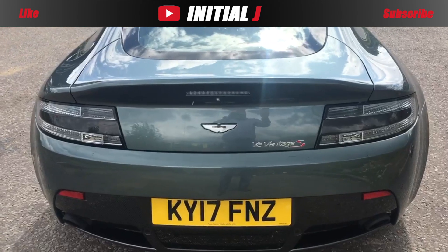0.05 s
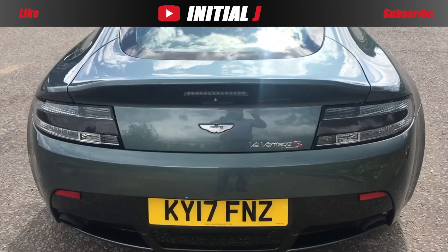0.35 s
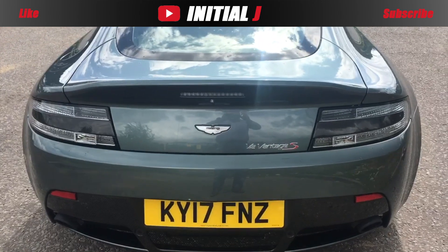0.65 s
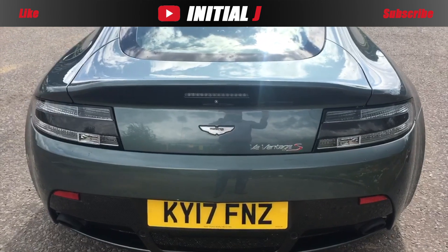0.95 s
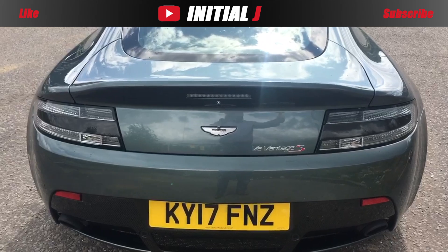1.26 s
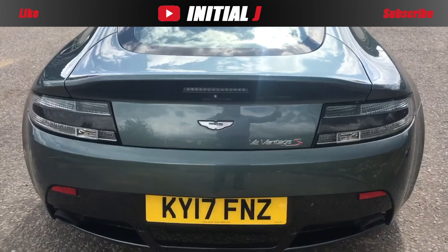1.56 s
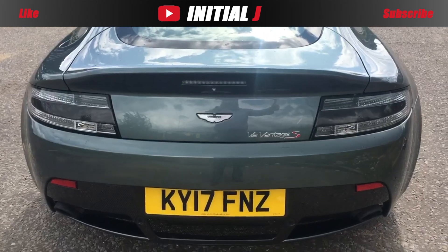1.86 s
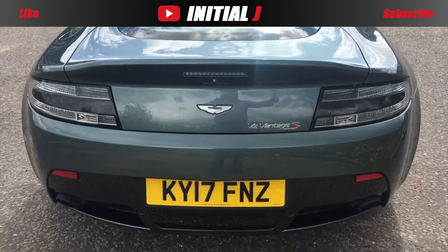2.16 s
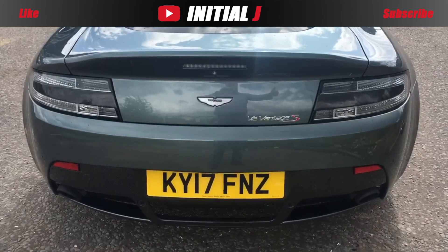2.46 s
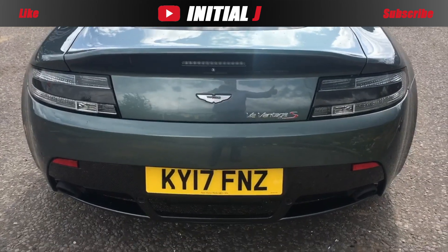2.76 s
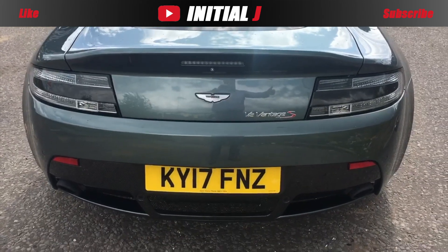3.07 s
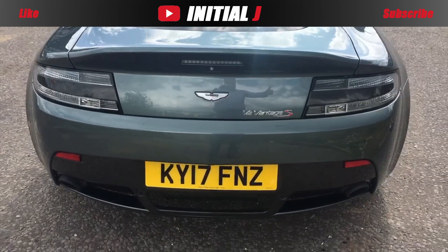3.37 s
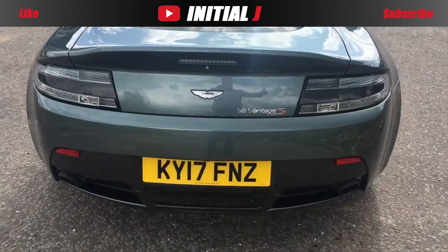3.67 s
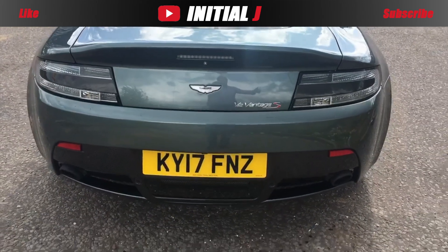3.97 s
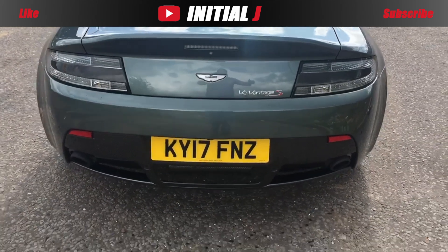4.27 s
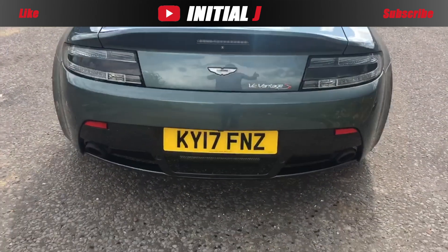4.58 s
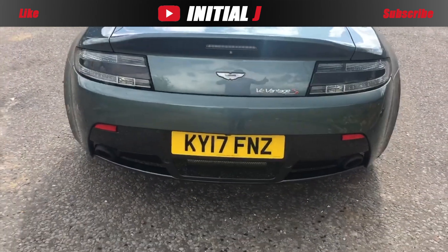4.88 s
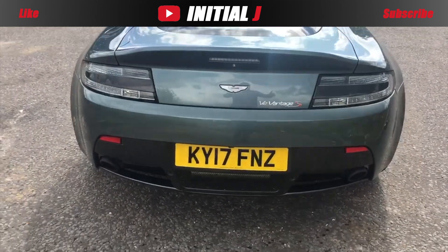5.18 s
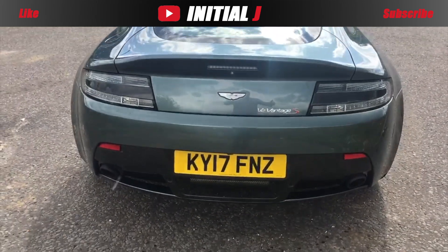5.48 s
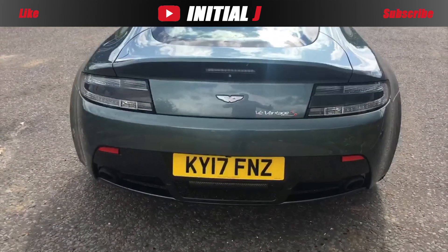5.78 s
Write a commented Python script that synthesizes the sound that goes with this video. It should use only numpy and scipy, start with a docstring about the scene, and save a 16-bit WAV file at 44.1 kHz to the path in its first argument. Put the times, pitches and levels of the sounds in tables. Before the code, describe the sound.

Two loud revs from an idling eight-cylinder car, with exhaust cracks and popping as the engine winds down between them.

```python
"""A low idling hum leaps into a hard rev, cracks and burbles back down to idle, then revs again.
It is an eight-cylinder sports car on open tarmac, heard from behind its tailpipes. Each firing pushes
out a pulse of gas: the pulses make the note, ring the silencer and pipes, and steepen into hiss under
load. Unburnt fuel pops on the overrun, when the engine coasts with the throttle shut.
The listener steps back a little; a limiter holds the loudest moments."""
import sys
import numpy as np
from scipy import signal
from scipy.io import wavfile
from scipy.ndimage import uniform_filter1d, minimum_filter1d

SR = 44100
rng = np.random.default_rng(int(sys.argv[2]) if len(sys.argv) > 2 else 0)


def store_pcm(level_fs):
    """Save levels as 16-bit WAV."""
    pcm = np.round(np.clip(level_fs, -1, 1) * 32767).astype(np.int16)
    wavfile.write(sys.argv[1], SR, np.atleast_2d(pcm).T)


N = 257103
T = np.arange(N) / SR
IDLE_HZ = 72.25  # firings per second

# how each firing of one engine cycle departs from the mean pulse: (offset [relative])
CYLINDER_OFFSETS = [0.92, 1, -0.27, 0.0057, 0.34, 0.08, -1, -0.27]
# blips of the throttle: (opens [s], is shut [s], closing takes [s])
THROTTLE_BLIPS = [(1.507, 2.015, .09), (5.362, 5.805, 0.033)]


def amp(db):
    """Decibels to gain."""
    return 10 ** (np.asarray(db) / 20)


def running_rms(x, seconds):
    """The smoothed level of x."""
    size = int(seconds * SR)
    return np.sqrt(abs(uniform_filter1d(uniform_filter1d(x * x, size), size)) + 1e-14)


def steady(x, seconds=0.032):
    """Scales x to a running rms of 1."""
    return x / running_rms(x, seconds)


def band(x, lo_hz, hi_hz, order=2):
    """Band-pass filter."""
    edges_hz = [max(lo_hz, 5), min(hi_hz, SR / 2 - 100)]
    return signal.sosfilt(signal.butter(order, edges_hz, "band", fs=SR, output="sos"), x)


def ring(x, hz, width):
    """One resonance with steep skirts."""
    return band(x, hz - width / 2, hz + width / 2)


def colour(x, points):
    """Minimum-phase EQ through (frequency [Hz], gain [dB]) points: it rings only after each impulse."""
    hz, db = np.transpose(points)
    bins_hz = abs(np.fft.fftfreq(2048, 1 / SR))
    log_gain = np.log(amp(np.interp(np.log(bins_hz + 1), np.log(hz + 1), db)))
    taps = np.fft.ifft(np.exp(np.conj(signal.hilbert(log_gain)))).real
    return signal.oaconvolve(x, taps[:len(taps) // 2])[:N]


def response(points, hz):
    """Reads (frequency [Hz], gain [dB]) points on a log-frequency axis."""
    points_hz, db = np.transpose(points)
    return np.interp(np.log(hz), np.log(points_hz), db)


def wander(per_s):
    """A random drift of about unit size."""
    return np.interp(T * per_s, np.arange(4000), rng.standard_normal(4000))


def gate(start, end, rise_s, fall_s):
    """Rises from start, holds at 1 until end, then falls."""
    return np.clip((T - start) / rise_s, 0, 1) * np.clip(1 - (T - end) / fall_s, 0, 1)


def add(mix, s, sound):
    """Mixes a sound in at time s."""
    part = mix[max(round(s * SR), 0):][:len(sound)]
    part += sound[:len(part)]


def bursts(events, lo_hz, hi_hz, rise_s, decay_s, gain_db):
    """A short dying burst of band noise for each event, peaking at its level plus gain_db."""
    out, t = np.zeros(N), T[:4096]
    for s, db in events:
        burst = rng.standard_normal(len(t)) * (1 - np.exp(-t / rise_s)) * np.exp(-t / decay_s)
        burst = band(band(burst, lo_hz, hi_hz, order=1), lo_hz / 2, 2 * hi_hz)
        add(out, s, amp(db + gain_db) * burst / abs(burst).max())
    return out


def stepped_back():
    """The listener's place, from 0 (close) to 1 (farther back)."""
    return np.interp(T, (3.4, 4.85), [0, 1])


def sag_db():
    """The low end dips before each rev."""
    # dips: (start [s], end [s], gain [dB])
    dips = [(1.382, 1.453, -4.5), (4.477, 5.341, -5.5)]
    return sum(db * gate(start, end, .015, 0.016) for start, end, db in dips)


def firing_rate():
    """Firings per second: a climb on the throttle, then friction slows the engine until it idles."""
    # the climb of every rev: (time since opening [s], firing rate [Hz])
    climb = [(0, 72), (.04, 80), (.08, 97), (.12, 137), (.2, 223), (.28, 337), (.36, 450), (.42, 505),
             (.475, 528)]
    # the spin-down: (time since shutting [s], speed [share of the top speed])
    spin_down = [(0, 0.98), (.16, .885), (.52, .672), (.88, .506), (1.22, .368), (1.6, .303), (1.96, .25),
                 (2.36, .183), (3.05, .132)]
    rate = IDLE_HZ - .3 * T  # the idle droops slightly
    for opens, shuts, _ in THROTTLE_BLIPS:
        revved_hz = np.interp(np.minimum(T, shuts) - opens, *np.transpose(climb), left=0)
        rate = np.maximum(rate, revved_hz * np.interp(T - shuts, *np.transpose(spin_down)))
    return rate


def blip(opens, shuts, closing_s, opening_s=0.07):
    """The throttle opens evenly, is held, eases off and then snaps shut."""
    closing = np.clip((T - shuts) / closing_s + 1, 0, 1)
    return np.clip((T - opens) / opening_s, 0, 1) * (1 - closing ** 2)


def driving(onset_s=0.034, coast_s=2.34, recover_s=0.65):
    """Throttle, overrun and raggedness of combustion, each 0-1."""
    # a little gas fed in on the way down: (start [s], end [s], throttle [0-1])
    feeds = [(1.973, 2.097, .08), (2.12, 2.289, .38), (2.688, 3.107, 0.2), (4.596, 4.946, 0.02)]
    # spells of ragged combustion: (start [s], end [s], fade [s], depth [0-1])
    spells = [(1.596, 1.619, 0.013, .55), (1.853, 1.955, 0.01, 0.93), (3.156, 3.433, 0.088, 0.81),
              (3.462, 4.047, 0.34, 0.88), (4.37, 4.46, .05, 0.4), (4.664, 4.949, 0.036, 0.16),
              (5.412, 5.46, 0.033, 0.4), (5.633, 5.666, 0.017, 0.58), (5.744, 5.774, 0.039, 0.5)]
    throttle = sum(blip(*rev) for rev in THROTTLE_BLIPS)
    throttle += sum(share * gate(start, end, 0.062, 0.11) for start, end, share in feeds)
    overrun = sum(gate(shuts - onset_s, shuts + coast_s, onset_s, recover_s)
                  for _, shuts, _ in THROTTLE_BLIPS)
    ragged = sum(depth * gate(start, end, .022, fade) for start, end, fade, depth in spells)
    return np.clip([throttle, overrun, ragged], 0, 1)


def loudness(law, rate, throttle, overrun, ragged):
    """A layer's fader in dB, riding the state of the engine."""
    idle, per_octave, load, coasting, burbling, crackling = law
    return (idle + per_octave * np.log2(rate / IDLE_HZ) + load * throttle + coasting * overrun
            + ragged * (burbling * (1 - throttle) + crackling * throttle))


def firings(phase, uneven, mean, pattern):
    """One pulse a firing: a mean push, the cylinder's own share and the luck of combustion."""
    at = np.flatnonzero(np.diff(np.floor(phase)))
    own = np.resize(CYLINDER_OFFSETS, len(at))
    luck = rng.standard_normal(2000)[:len(at)]
    pulses = np.zeros(N)
    pulses[at] = mean + pattern * (1 - uneven[at]) * own + uneven[at] * luck
    return pulses


def puffs(phase, length, between, scatter_db, cylinder_db):
    """Turbulence that flares with each firing and fades toward a steady flow between them."""
    strength = amp(scatter_db * rng.standard_normal(2000) + cylinder_db * np.resize(CYLINDER_OFFSETS, 2000))
    flare = strength[phase.astype(int)] * np.exp(-(phase % 1) / length)
    return (between + flare) * rng.standard_normal(N)


def injectors(crank):
    """A faint high ticking, once for each turn of the crank."""
    clicks = np.diff(np.floor(crank), prepend=0) * amp(3 * wander(40))
    return amp(-85) * steady(ring(clicks, hz=6720, width=300), .3)


def ticks():
    """Faint stray ticks, perhaps of hot metal."""
    # ticks: (time [s], level [dB])
    hits = [(0.5372, -47), (0.7717, -61), (1.0749, -45), (1.516, -50), (4.1996, -38), (4.5381, -51),
            (4.6774, -43), (4.9439, -40), (5.0075, -43)]
    return bursts(hits, lo_hz=5500, hi_hz=15000, rise_s=.00005, decay_s=.0003, gain_db=-3.5)


def clack():
    """A clack as the idle returns, perhaps a flap in the exhaust."""
    # the clack: (time [s], level [dB])
    hits = [(4.938, -34)]
    return bursts(hits, lo_hz=1430, hi_hz=2140, rise_s=.001, decay_s=0.019, gain_db=1.5)


def cracks(throttle, uneven):
    """Sharp cracks bark at the pipe mouths; ragged firing under load adds a bright snap."""
    # cracks: (time [s], level [dB])
    hits = [(1.5289, -28), (1.5998, -12), (1.6174, -12), (1.7894, -12), (1.8234, -9), (1.8964, -6),
            (1.9174, -6), (1.9274, -8), (1.9434, -9), (1.9514, -10), (1.9749, -13), (5.6344, -9),
            (5.7744, -7)]
    bark = bursts(hits, lo_hz=1500, hi_hz=3740, rise_s=.0001, decay_s=0.0017, gain_db=-7)
    snap = bursts(hits, lo_hz=5130, hi_hz=9900, rise_s=.0001, decay_s=0.001, gain_db=-5.5)
    return bark + throttle * uneven ** 2 * snap


def pops(boom_hz=260.5, boom_rise_s=0.017):
    """Unburnt fuel pops: a low thump, and a boom that swells and dies in the silencer box."""
    # pops: (time [s], thump level [dB], boom level [dB])
    hits = [(1.855, -16, -39), (1.913, -6.5, -27), (1.932, -14, -24), (2.408, -27, -53), (2.78, -24, -30.5),
            (2.869, -17.5, -18), (2.955, -28, -40), (3.04, -40, -21.5), (3.188, -10, -24.5),
            (3.237, -13.5, -29), (3.529, -11.5, -25), (3.588, -8, -28), (3.689, -15, -20),
            (3.754, -12, -21.5), (3.824, -19.5, -18.5), (3.956, -18, -21), (4.038, -26, -22),
            (4.115, -26, -21), (4.206, -17, -18.5), (4.386, -31, -27), (4.945, -23, -38)]
    thumps = [hit[:2] for hit in hits]
    out = bursts(thumps, lo_hz=44.8, hi_hz=236, rise_s=.002, decay_s=0.029, gain_db=-5)
    t = T[:8192]
    swell = t / boom_rise_s * np.exp(1 - t / boom_rise_s)
    for s, _, boom_db in hits:
        add(out, s, amp(boom_db) * swell * np.sin(2 * np.pi * (boom_hz * t + rng.random())))
    return out


def hiss(phase, throttle, uneven, level_db):
    """Smooth flow noise when coasting; under load the firings steepen into spitting shock fronts."""
    # colour of the gas flow, coasting and under load: (frequency [Hz], gain [dB])
    coast_eq = [(1880, -1), (3200, -1), (3680, -4), (4700, -13), (5550, -11.5), (6170, -9), (6810, -12),
                (7420, -17.5), (8590, -13.5), (9180, -15.5), (9940, -21.5), (12000, -20), (15600, -28)]
    load_eq = [(1650, -47.5), (2800, 7), (2990, -6), (3650, -3), (3870, -5.5), (4280, -3), (4830, -11),
               (5700, -6), (6310, -9.5), (7440, -14.5), (8650, -10), (9840, -18.5), (10800, -19.5),
               (15600, -32)]
    flow = colour(puffs(phase, length=.5, between=3, scatter_db=2, cylinder_db=.5), coast_eq)
    shocks = steady(firings(phase, uneven, mean=1.1, pattern=0.55))
    tearing = steady(puffs(phase, length=1.0, between=1.0, scatter_db=6.5, cylinder_db=0.0))
    pipe_tips = amp(3.5) * uneven ** 2 * ring(shocks, hz=6280, width=1000)  # rung by ragged firings
    spit = colour(tearing + amp(-9.5) * shocks + pipe_tips, load_eq)
    flow, spit = (steady(band(x, 3010, 26000, order=4)) for x in (flow, spit))
    return amp(level_db) * (np.sqrt(1 - throttle ** 2) * flow + throttle * spit)


def rasp(phase, crank, throttle, uneven, overrun, level_db):
    """Pulse edges and puffs ring the tailpipes, brighter as the throttle opens."""
    # tailpipe resonances: (frequency [Hz], width [Hz], gain [dB], extra on the overrun [dB],
    # extra at full throttle [dB], extra from farther back [dB])
    pipe_modes = [(465, 203, -3, -6.5, -4, -3), (523, 24, 8.5, -11.5, -8.5, -7),
                  (581.6, 129.5, 1, 4.5, -1, -2), (662.6, 47, 1, 5, -0.5, 1), (746, 67, 4, 8, -0.5, 1),
                  (874, 67, 0.5, 1, 3.5, 5), (1100, 41, -4, 5, -2, 2.5), (1183, 43, -5, -5.5, 0, 4.5),
                  (1309, 63, 0, -0.5, 5, -5.5), (1459, 107, -2.5, 6.5, 10.5, -2),
                  (1720, 140, -8, 0, 5.5, 5), (1856, 99, -12, 2, 9.5, 3), (2090, 174, -10, 0, 11, -5.5),
                  (2387, 150, -14, -5, 4.5, 1.5), (3530, 600, -26, -11, 11.5, -1)]
    stagger = 0.089 * uneven * throttle * wander(220)  # under load pulses arrive a little early or late
    edges = steady(firings(phase + stagger, uneven, mean=0.59, pattern=1.3))
    gas = steady(puffs(phase, length=0.89, between=0.57, scatter_db=0.0, cylinder_db=4.0))
    drive = edges + amp(13.5 - 9.9 * throttle) * uneven * gas  # ragged combustion is more turbulent
    farther = stepped_back()
    pipes = 0
    for hz, width, db, overrun_db, load_db, far_db in pipe_modes:
        gain = amp(db + overrun_db * overrun + load_db * throttle + far_db * farther)
        pipes += gain * ring(drive, hz, width)
    chuff = np.cos(2 * np.pi * crank) + .5 * np.cos(np.pi * crank)  # once a turn, every other one harder
    idle_chuff_db = 2.0 * (1 - throttle) * (1 - overrun) * chuff
    return amp(level_db + idle_chuff_db) * steady(pipes, 0.042)


def silencer(pulses, modes, overrun, rate, in_tune_db):
    """The exhaust boxes ring; on the overrun a mode shifts by in_tune_db as the firing rate crosses it."""
    out = 0
    for hz, width, db, overrun_db in modes:
        in_tune = np.exp(-((rate - hz) / width) ** 2)
        out += amp(db + overrun * (overrun_db + in_tune_db * in_tune)) * ring(pulses, hz, width)
    return steady(out, 0.054)


def burble(phase, rate, uneven, overrun, thud_db, drone_db):
    """Differences between firings thud and drone in the silencer, filling in around the note."""
    # silencer resonances: (frequency [Hz], width [Hz], gain [dB], extra on the overrun [dB])
    thud_modes = [(50.3, 17, -7.5, 2.5), (89.8, 29, -0.5, -1), (140.7, 49, -2.5, 5.5)]
    drone_modes = [(212.5, 22.7, 4, -6), (264, 30.8, -8.5, 7), (303, 23, -16, 12.5),
                   (398, 120, -30.5, -0.5)]
    pulses = firings(phase, uneven, mean=0, pattern=0.81)
    thud = silencer(pulses, thud_modes, overrun, rate, in_tune_db=-7.0)
    drone = silencer(pulses, drone_modes, overrun, rate, in_tune_db=-0.5)
    outrun_db = 16.5 * np.maximum(np.log2(rate / 255), 0)  # above 255 Hz the firings outrun the silencer
    return amp(thud_db) * thud + amp(drone_db - outrun_db + sag_db()) * drone


def note(phase, rate, throttle, overrun):
    """The firing tone and its octave sweep the exhaust's resonances: a hum at idle, torn under load."""
    # what the exhaust passes at full throttle and on the overrun: (frequency [Hz], level [dB])
    load_eq = [(72, -24), (92, -17), (144, -8.5), (175, -14), (215, -8), (270, -23.5), (340, -32),
               (450, -32.5), (560, -38), (680, -22), (770, -22), (950, -27.5), (1100, -51)]
    overrun_eq = [(72, -33), (85, -42.5), (105, -47), (130, -62), (185, -30), (240, -28.5), (268, -24.5),
                  (300, -41.5), (375, -57), (465, -37.5), (550, -77), (1000, -69)]
    # how the note changes from farther back: (frequency [Hz], gain [dB])
    distance_eq = [(215, -0.5), (280, 1.5), (350, 10), (460, -3.5), (700, 3)]
    drive_db = 14.5 * (throttle - 1) + sag_db()

    def passed_db(hz):
        fired_db = (1 - overrun) * (response(load_eq, hz) + drive_db)
        return fired_db + overrun * response(overrun_eq, hz) + stepped_back() * response(distance_eq, hz)

    tone_db = passed_db(rate) + wander(25) + throttle * wander(120)
    octave_db = passed_db(2 * rate) - 5 * overrun + 0.28 * wander(3.3) + 1.3 * throttle * wander(130)
    tone = amp(tone_db) * np.sin(2 * np.pi * phase)
    octave = amp(octave_db) * np.sin(4 * np.pi * phase + 0.48 * throttle * wander(110))
    return np.sqrt(2) * (tone + octave)


def scene():
    """One engine speed drives the exhaust layers; pops, cracks, ticks and a clack land on top."""
    # layer faders: (idle level [dB], rise with speed [dB/octave], extra at full throttle [dB],
    # on the overrun [dB], when ragged off the throttle [dB], when ragged under load [dB])
    thud_law = (-37, 0, 6.5, -3.5, 10.5, 4.5)
    drone_law = (-32.5, 2.5, 6, -7, 5, -8)
    rasp_law = (-44.5, 3.5, 21.5, 1, 9, -2)
    hiss_law = (-66, 3.5, 25, 0.5, 5, 6)
    rate = firing_rate()
    throttle, overrun, ragged = driving()
    uneven = np.clip(.43 + .08 * throttle - .16 * overrun + .52 * ragged, 0, 1)  # of the combustion
    flutter = .012 * uneven * wander(45) + .04 * throttle * wander(90)  # tears the harmonics under load
    phase = np.cumsum(rate * (1 + flutter)) / SR  # counts the firings
    crank = phase * 2 / len(CYLINDER_OFFSETS)  # two crank turns to a cycle
    thud_db, drone_db, rasp_db = (loudness(law, rate, throttle, overrun, ragged)
                                  for law in (thud_law, drone_law, rasp_law))
    hiss_db = loudness(hiss_law, rate, throttle ** 2, overrun, ragged)  # hiss needs a wide-open throttle
    mix = note(phase, rate, throttle, overrun)
    mix += burble(phase, rate, uneven, overrun, thud_db, drone_db)
    mix += rasp(phase, crank, throttle, uneven, overrun, rasp_db)
    mix += hiss(phase, throttle, uneven, hiss_db)
    mix += injectors(crank) + ticks() + clack() + pops() + cracks(throttle, uneven)
    return mix[None]


def record(dry, rms_ceiling_db=-8.5, peak_ceiling_db=-5.8, top_hz=15800):
    """Gain control ducks the mix on the loudest notes; then a fast peak limiter and a low-pass."""
    held = dry * np.minimum(1, amp(rms_ceiling_db) / running_rms(dry, .014))
    peak_gain = np.minimum(1, amp(peak_ceiling_db) / (abs(held) + 1e-9))
    limited = held * uniform_filter1d(minimum_filter1d(peak_gain, size=61), size=61)
    low_pass = signal.firwin(511, top_hz, window=("kaiser", 9), fs=SR)
    return signal.oaconvolve(limited, low_pass[None], "same")


dry = scene()
out = record(dry)
store_pcm(out)
```